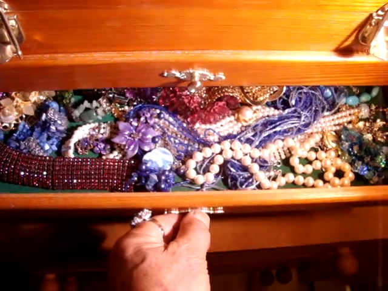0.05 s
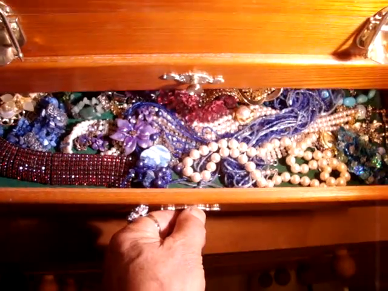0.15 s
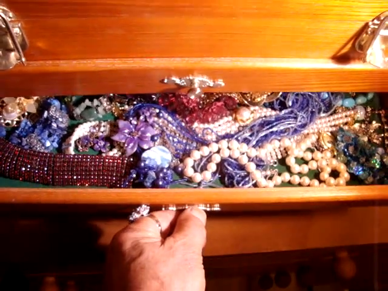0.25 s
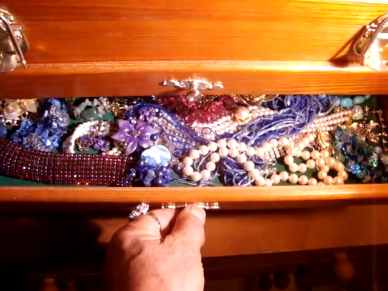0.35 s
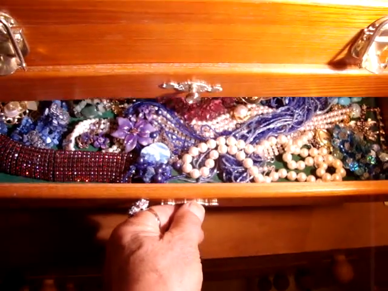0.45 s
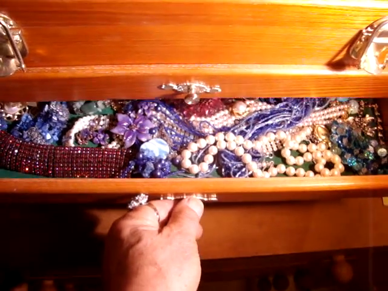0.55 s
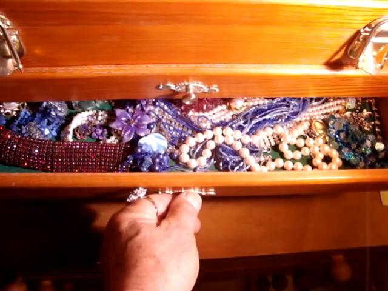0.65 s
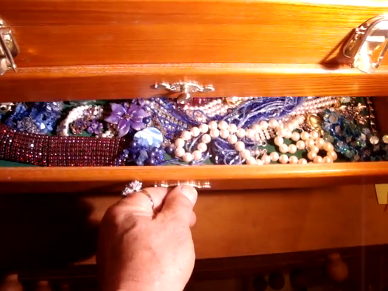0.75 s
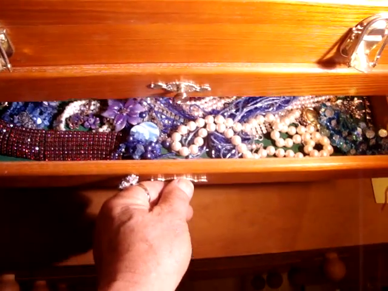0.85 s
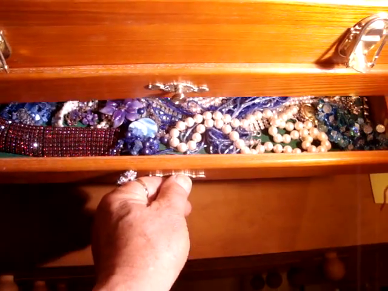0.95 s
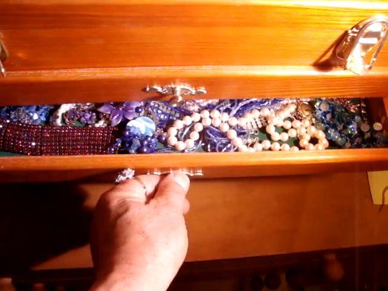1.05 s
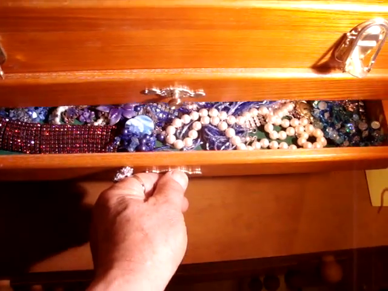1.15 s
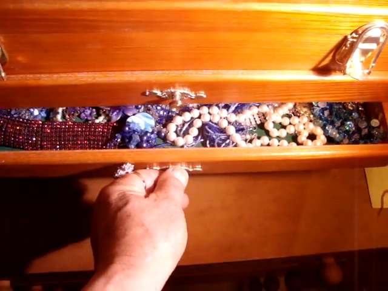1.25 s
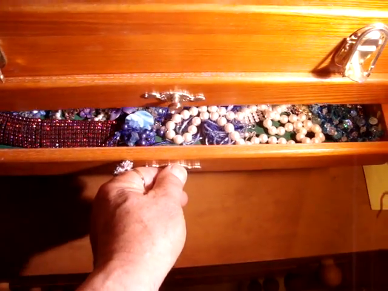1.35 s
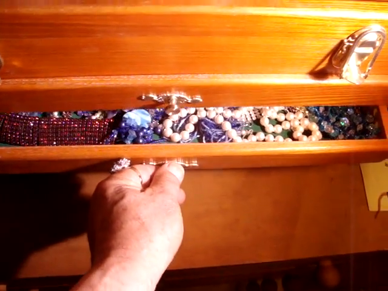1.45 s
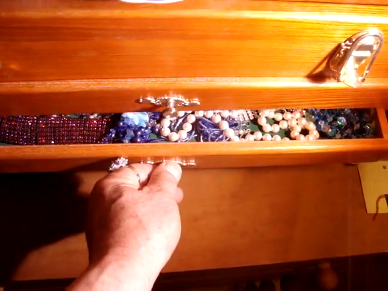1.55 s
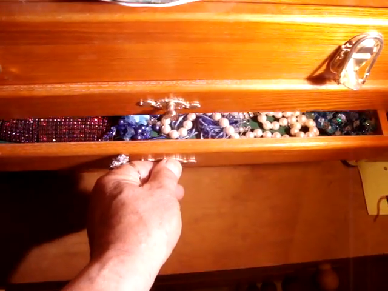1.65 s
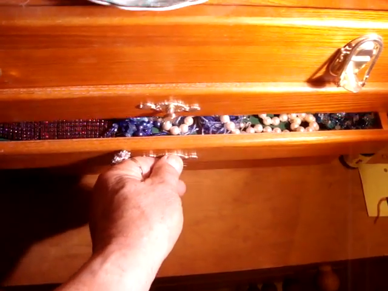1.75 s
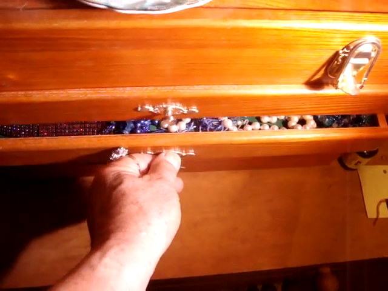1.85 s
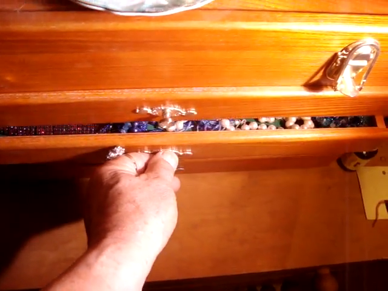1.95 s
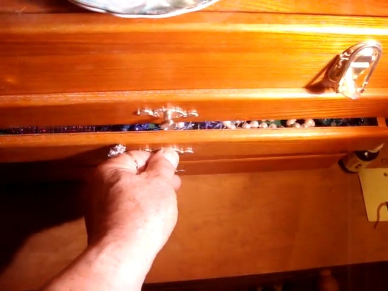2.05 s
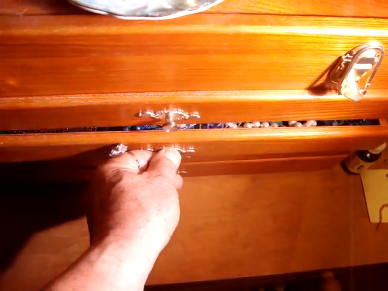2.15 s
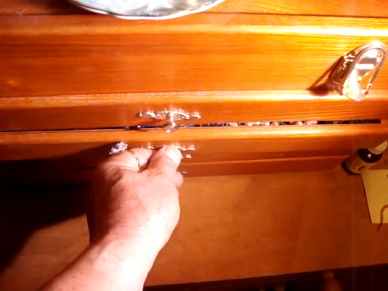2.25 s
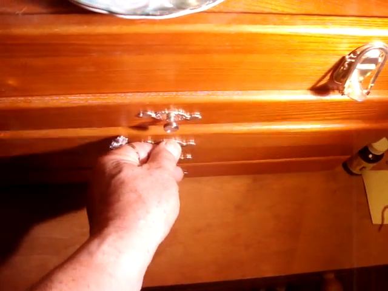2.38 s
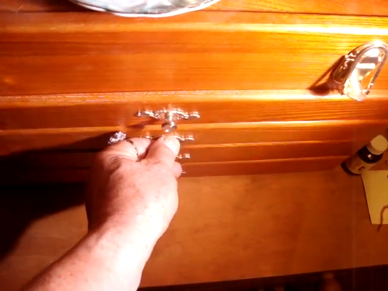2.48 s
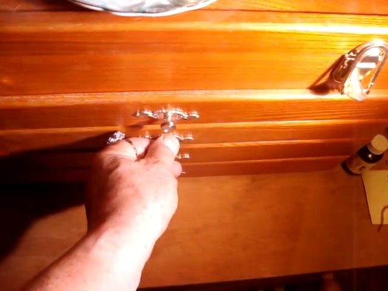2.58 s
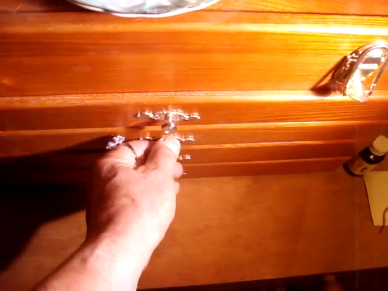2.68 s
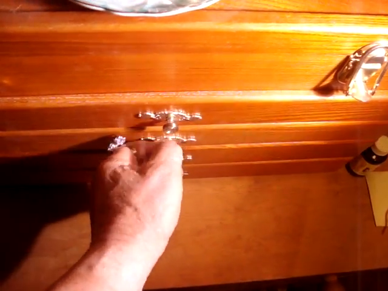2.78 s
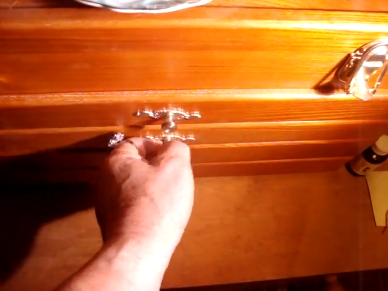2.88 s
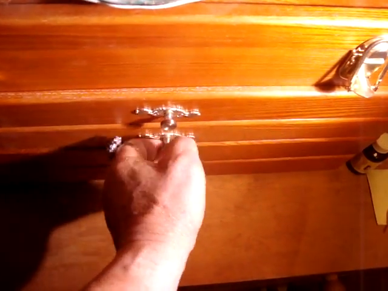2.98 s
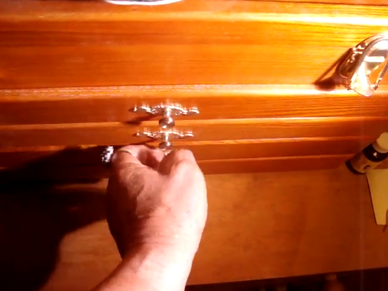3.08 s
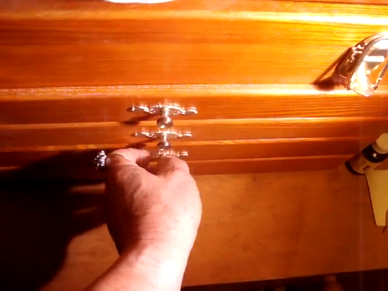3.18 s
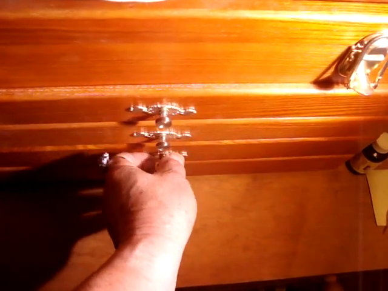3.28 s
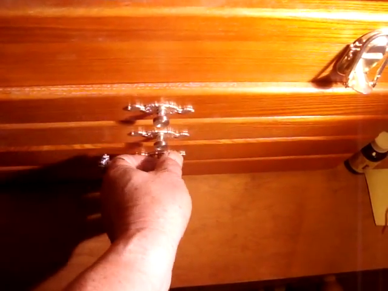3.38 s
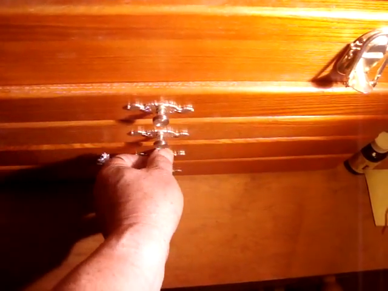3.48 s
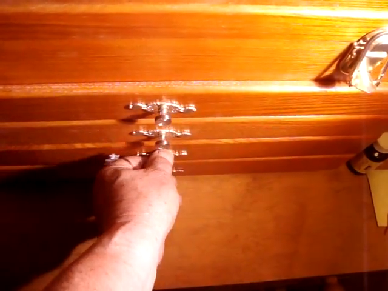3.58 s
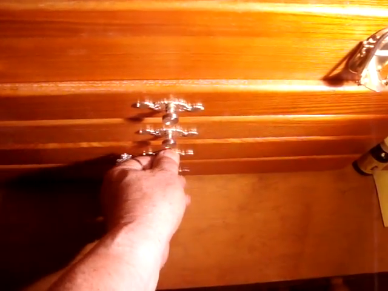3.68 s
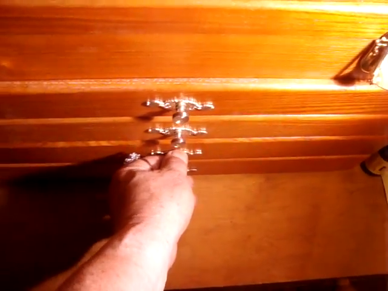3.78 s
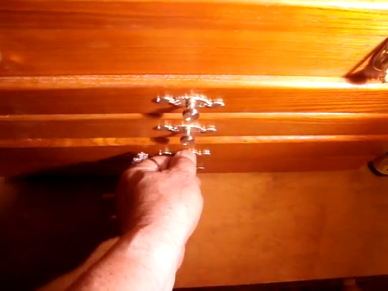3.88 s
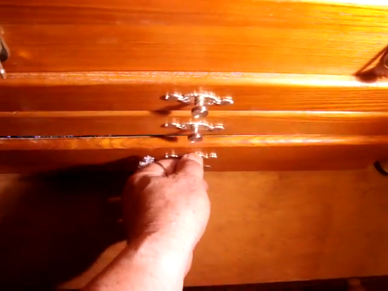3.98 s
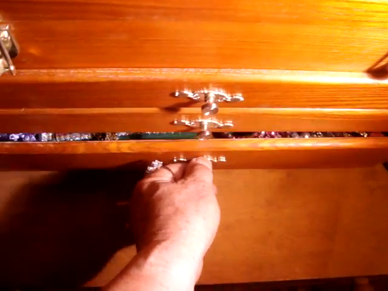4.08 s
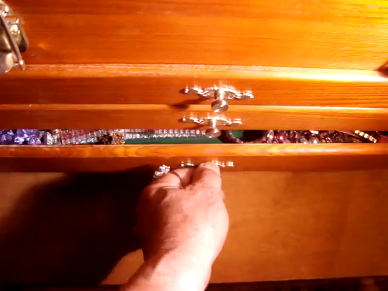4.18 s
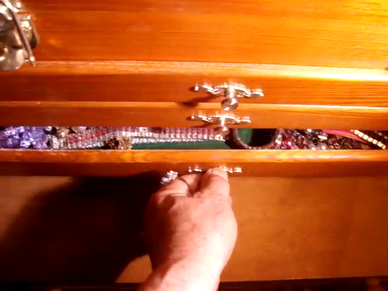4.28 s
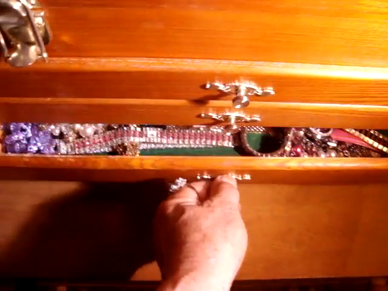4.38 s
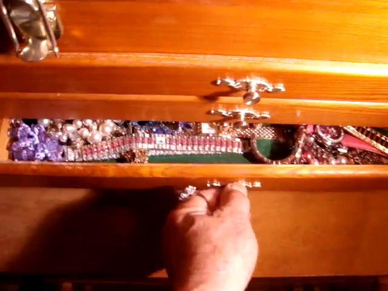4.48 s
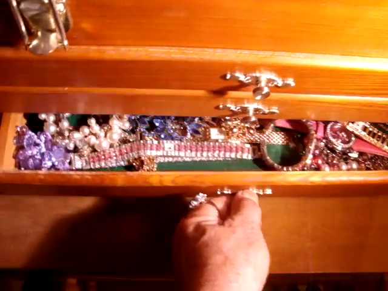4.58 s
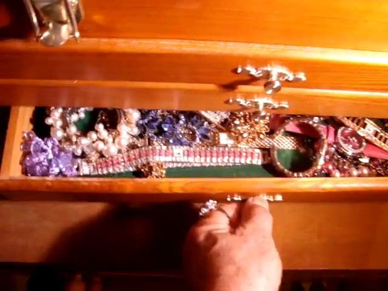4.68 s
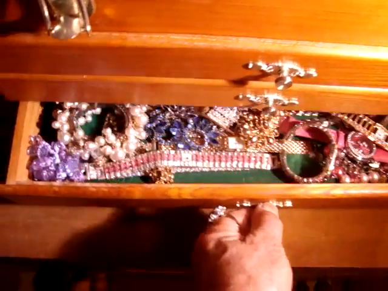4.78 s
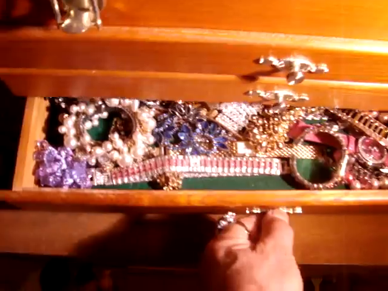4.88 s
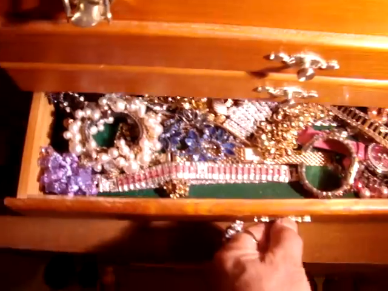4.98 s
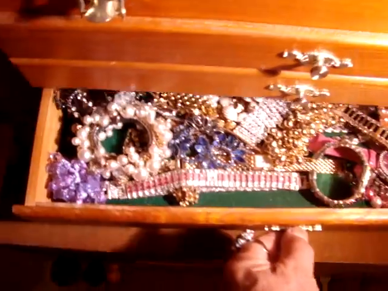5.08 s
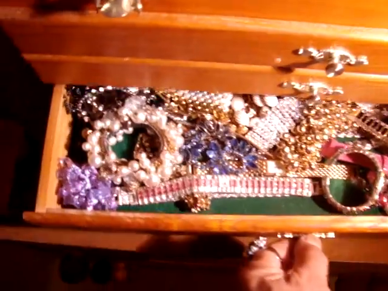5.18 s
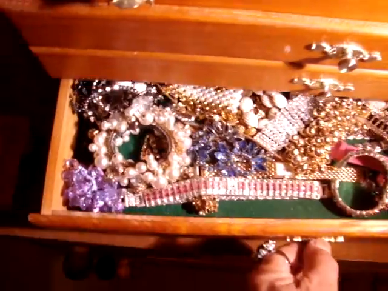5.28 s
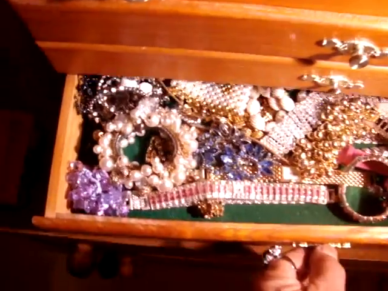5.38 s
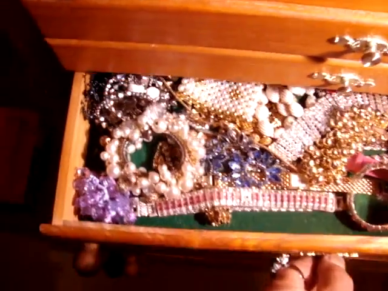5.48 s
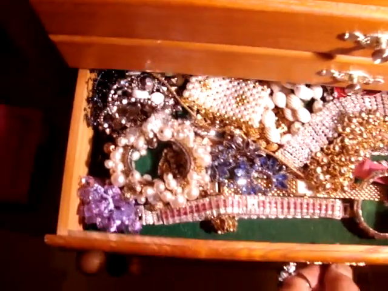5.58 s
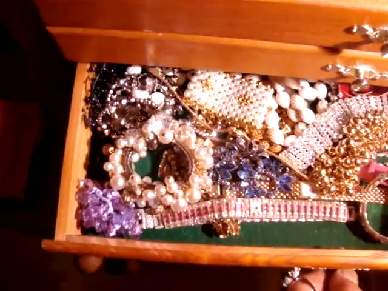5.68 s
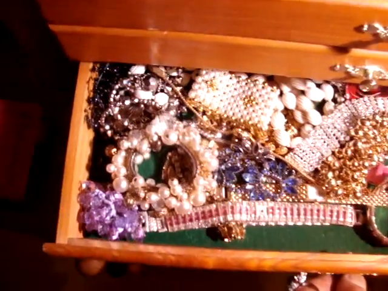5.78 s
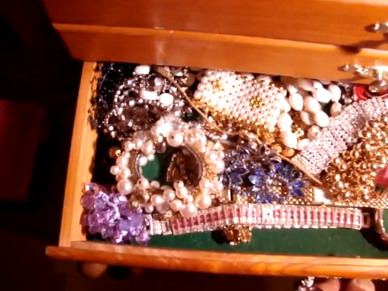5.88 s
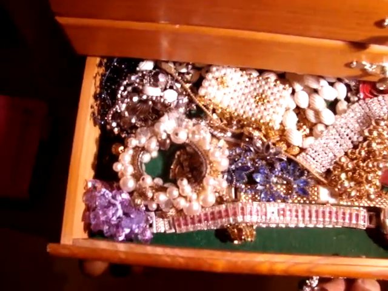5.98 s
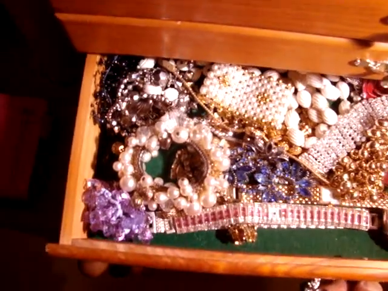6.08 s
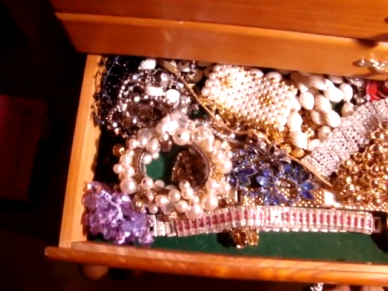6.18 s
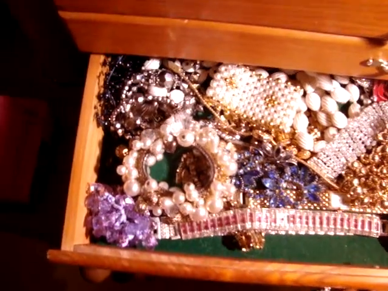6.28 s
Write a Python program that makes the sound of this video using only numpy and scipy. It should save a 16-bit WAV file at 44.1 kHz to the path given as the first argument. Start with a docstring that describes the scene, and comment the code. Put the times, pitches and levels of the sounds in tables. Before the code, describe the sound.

Close, dry rubbing and knocks of one wooden jewellery drawer closing and a second opening, over a quiet room's hiss.

```python
"""Jewellery chest drawers, close by.

One drawer slides in on dry wooden runners, beads ticking, touches and knocks shut. The fingers move to
the next metal pull; that drawer comes unstuck, slides out and drags to a halt. Slips of wood grain drive
the panels, knocks ring the chest, the pulls bounce in their mounts. Quiet room with steady hiss."""
import sys
import numpy as np
from scipy import signal
from scipy.fft import rfft, irfft
from scipy.io import wavfile

SR = 44100
rng = np.random.default_rng(int(sys.argv[2]) if len(sys.argv) > 2 else 0)


def inscribe(sig):
    """Save sig as 16-bit PCM at rate SR to the path in sys.argv[1].

    A 1-D sig is mono; a 2-D sig holds one channel per row.
    Samples are clipped to [-1, 1] before scaling.
    """
    pcm = np.round(np.clip(np.atleast_2d(sig).T, -1, 1) * 32767)
    wavfile.write(sys.argv[1], SR, pcm.astype(np.int16))


N = 279622

# Runner friction; push = upper drawer in, pull = lower drawer out: time_s, level_db
PUSH_FRICTION = [(0.44, -53), (0.506, -55), (0.516, -45), (0.7, -45.9), (0.84, -44.6), (0.92, -48),
                 (1.03, -49.5), (1.15, -56), (1.25, -52), (1.48, -57), (1.79, -51), (1.87, -59),
                 (1.97, -65), (2.02, -57), (2.18, -63), (2.48, -55)]
PULL_FRICTION = [(3.88, -58), (4.068, -56), (4.1, -52), (4.35, -55), (4.6, -48), (4.664, -40.5),
                 (4.684, -48), (4.735, -44.5), (4.844, -48), (4.95, -46), (5.02, -45.7), (5.12, -52),
                 (5.354, -58), (5.53, -55)]
# Broad rubbing spectra: freq_hz, gain_db
PUSH_SPECTRUM = [(60, -43), (200, -28), (600, -1), (1170, -2.3), (1800, -0.5), (2200, -1.8), (3000, -1.5),
                 (3700, -8.5), (4900, -3.8), (5800, -5.8), (6600, -11.5), (10000, -14.8)]
PULL_SPECTRUM = [(60, -28), (200, -10.5), (500, -5.0), (1200, 0.0), (2100, -1.6), (3000, -1.9),
                 (4300, -9.3), (5600, -13.7), (10000, -17.4)]
DRAG_SPECTRUM = [(60, -32), (200, -5), (550, -2.5), (950, 3), (1450, -6.5), (2800, -2.7), (4500, -9.5),
                 (10000, -16.5)]
# Drawer panel resonances: centre_hz, width_hz, lift_db
PUSH_RESONANCES = [(605, 150, 8.7), (985, 110, 7), (1350, 130, 14.8), (1590, 180, 9.5), (2510, 140, 9),
                   (3315, 180, 13.6), (4026, 160, 8), (4274, 160, 5.5)]
PULL_RESONANCES = [(595, 75, 8), (743, 100, 9.5), (1093, 120, 8), (1391, 85, 8.5), (1826, 240, 6.8),
                   (2972, 120, 5.5), (3458, 120, 4), (4203, 128, 5.1)]
# Band favoured by the travelling rubbing point: time_s, centre_hz
PUSH_BAND = [(.45, 1520), (.52, 2500), (.72, 3300), (.79, 4170), (1.03, 4200), (1.25, 2880), (1.9, 2880),
             (2.2, 1000)]
PULL_BAND = [(4.38, 1300), (4.5, 2860), (4.98, 700)]
# Dry patches on the runners: start_s, length_s, level_db, centre_hz, width_hz
DRY_PATCHES = [(.76, .14, -53, 4150, 800), (1.2, .13, -60, 4200, 1600), (1.56, .2, -56.5, 2950, 600),
               (1.74, .1, -53.5, 2950, 900), (4.07, .06, -58, 2600, 2200), (4.46, .13, -58, 3650, 1500),
               (4.99, .1, -56.5, 3850, 1000), (5.25, .045, -56, 2800, 900), (5.568, .04, -49, 900, 450)]

# Wood on wood; ring_db is lower where the hand damps it:
# start_s, level_db, low_hz, soft_hz, settle_s, spot_hz, width_hz, lift_db, ring_db
WOOD_KNOCKS = [(.1623, -19.5, 450, 1200, .0029, 1000, 450, 8, -5),
               (1.793, -20, 200, 220, .0063, 280, 140, 6, -2),
               (2.4938, -11.8, 150, 650, .004, 520, 130, 4, -1),
               (2.547, -4.4, 110, 4800, .00417, 1300, 420, 8, -.2),
               (3.282, -29.5, 150, 750, .008, 1000, 500, 6, 0),
               (3.736, -25, 130, 200, .005, 185, 70, 13, -2),
               (4.075, -9.5, 150, 190, .0065, 305, 70, 13, -7),
               (4.661, -32, 700, 3000, .004, 2050, 900, 7, 0),
               (5.563, -10.5, 115, 125, .006, 172, 55, 20.5, -7),
               (5.632, -21, 170, 220, .0089, 195, 45, 16, -3)]
# Further touches of a drawer landing askew: settle_share, gain_db, hardness_ratio
KNOCK_REBOUNDS = [(.46, -5, 1.15), (1, 2.4, .39)]
# Spectra of a knock's first crack and of the dense case ringing: freq_hz, gain_db
CRACK_SPECTRUM = [(60, -31), (200, -8.5), (520, 0), (780, -8), (1000, -1.5), (1600, 1.5), (2300, -2.5),
                  (2800, -15), (3200, -10), (4200, -26), (6500, -25.5), (10000, -29)]
CASE_SPECTRUM = [(60, -18), (150, -4), (450, -10), (800, 3.5), (1300, 3), (2000, 5.5), (2700, -12),
                 (4500, -25), (10000, -31)]
# Decay of the case ringing: freq_hz, t60_s
CASE_DECAY = [(100, 0.44), (400, 0.27), (1200, 0.098), (2500, 0.021), (9000, 0.013)]
# Modes of the chest and of the metal pull: pitch_hz, level_db, t60_s
CHEST_MODES = [(106, -35, .18), (164, -30, .16), (242, -30, .12), (290, -31, .12), (415, -20.5, .11),
               (474, -21.5, .08), (623, -25.5, .08), (806, -25.5, .095), (955, -24, .08), (1083, -20, .075),
               (1232, -21, .06), (1390, -18.5, .08), (1630, -22.5, .07), (1950, -21.5, .065),
               (2047, -23, .06), (2280, -20, .034), (2700, -31, .028), (3100, -27, .033), (4480, -46, .025)]
METAL_MODES = [(1560, -6, .03), (1920, -1.5, .065), (2440, 1.5, .023), (2930, 3, .018), (3400, 3, .016),
               (3880, -1, .012), (4258, -2, .02), (5300, -7, .01), (7260, -6, .012), (8650, -1, .013)]
# Pull tapping in its mount: start_s, level_db, low_hz, soft_hz, first_gap_s
METAL_TAPS = [(.1628, -33.5, 2780, 5500, .0015), (.4205, -36.5, 2700, 4200, .0012),
              (2.496, -38, 2000, 2300, .003), (3.072, -47, 900, 2500, .004),
              (3.281, -33, 1650, 1600, .0104), (3.799, -43, 1500, 3500, .004),
              (4.661, -44, 1500, 8000, .003)]
# Bead on bead: start_s, level_db, pitch_hz, t60_s, other_pitch_hz, other_gain_db
BEAD_TICKS = [(.4193, -34, 8150, .008, 9650, -3), (2.288, -41, 6900, .01, 6000, -6)]

# Background hiss: freq_hz, gain_db
HISS_SPECTRUM = [(15, -42), (25, -17), (42, -13.5), (96, -12.5), (204, -5.5), (320, -2.7), (410, -2),
                 (568, -1.5), (1430, -6.6), (2300, -8.4), (4500, -13.3), (9800, -19.3), (12700, -63),
                 (21600, -120)]
# Low room rumble: time_s, level_db
RUMBLE_LEVELS = [(0, -70), (4.2, -71), (4.6, -86), (6.3, -91)]


def drawer_in(gain_db=1.2):
    """Upper drawer pushed in: firmly, then in weaker nudges."""
    friction = stroke(PUSH_FRICTION, rise_s=.55, release_s=.04)
    return amp(gain_db) * slide(friction, PUSH_SPECTRUM, PUSH_RESONANCES, PUSH_BAND,
                                band_db=3.3, band_oct=.15, light_db_per_oct=-.6, hard_db_per_oct=-.5)


def drawer_out(gain_db=1.2):
    """Lower drawer pulled out: it catches once and its rubbing sinks."""
    friction = stroke(PULL_FRICTION, rise_s=.1, release_s=.04)
    return amp(gain_db) * slide(friction, PULL_SPECTRUM, PULL_RESONANCES, PULL_BAND,
                                band_db=4.2, band_oct=.34, light_db_per_oct=2.3, hard_db_per_oct=-1.7)


def drawer_drag(start_s=5.575, hold_s=.06, level_db=-45.2, band_hz=490):
    """Almost out, the lower drawer sags and drags to a halt with a duller rub."""
    friction = stroke([(start_s, level_db), (start_s + hold_s, level_db)], rise_s=.028, release_s=.11)
    return slide(friction, DRAG_SPECTRUM, PULL_RESONANCES, [(start_s, band_hz)],
                 band_db=2, band_oct=.8, light_db_per_oct=-.3, hard_db_per_oct=0)


def stroke(levels, rise_s, release_s):
    """Friction amplitude: builds as the drawer creeps, follows the levels, dies away."""
    t = np.arange(N) / SR
    time_s, level_db = np.transpose(levels)
    power = np.interp(t, [time_s[0] - rise_s, time_s[0], time_s[-1], time_s[-1] + release_s],
                      [0, 1, 1, 0])
    return amp(np.interp(t, time_s, level_db)) * np.sqrt(power)


def slide(friction, spectrum, resonances, band, band_db, band_oct, light_db_per_oct, hard_db_per_oct,
          slips_per_s=14000, spread_db=1.5, chatter_db=.5, light_ring_share=.5):
    """Tiny slips of wood grain on the runners drive the drawer panels."""
    sizes = rng.standard_normal(N) * amp(spread_db * np.minimum(rng.exponential(1, N), 4))
    slips = sizes * (rng.random(N) < slips_per_s / SR)
    hz, t, slip_stft = signal.stft(unit(slips), SR, nperseg=1024)
    # Panel ringing and brightness follow the effort.
    effort = np.interp(t, np.arange(N) / SR, friction) / friction.max()
    panel_db = sum(lift_db / (1 + (2 * (hz - centre_hz) / width_hz) ** 2)
                   for centre_hz, width_hz, lift_db in resonances)
    ring_share = light_ring_share + (1 - light_ring_share) * effort
    wood_db = lookup(spectrum, hz)[:, None] + panel_db[:, None] * ring_share
    tilt_db_per_oct = light_db_per_oct + (hard_db_per_oct - light_db_per_oct) * effort
    band_hz = np.interp(t, *np.transpose(band))
    offset_oct = np.log2(np.maximum(hz, 100)[:, None] / band_hz)
    gain = amp(wood_db + offset_oct * tilt_db_per_oct + band_db * np.exp(-(offset_oct / band_oct) ** 2))
    gain /= np.sqrt(np.mean(gain ** 2, axis=0))
    rub = signal.istft(slip_stft * gain, SR, nperseg=1024)[1][:N]
    uneven_pressure = unit(butterworth(rng.standard_normal(N), "lowpass", cutoff_hz=45))
    return rub * friction * amp(chatter_db * uneven_pressure)


def rasps(slips_per_s=3000):
    """A dry patch passes: coarser slips swell and fade in one band."""
    out = np.zeros(N)
    for start_s, length_s, level_db, centre_hz, width_hz in DRY_PATCHES:
        slips = rng.standard_normal(N) * (rng.random(N) < slips_per_s / SR)
        scratch = resonance(slips[:round(length_s * SR)], centre_hz, width_hz)
        scratch = resonance(scratch, centre_hz, width_hz)
        swell = np.sin(np.linspace(0, np.pi, len(scratch)))
        add(out, start_s, amp(level_db) * unit(scratch) * swell)
    return out


def knocks(crack_db=-5, modes_db=-3.5, case_db=3.6, crunch_db=-20, rebound_low_hz=480):
    """Each blow cracks, sounds the struck spot and rebounds twice; the chest rings on."""
    out = np.zeros(N)
    crack = disperse(amp(crack_db) * click(CRACK_SPECTRUM))
    modes = disperse(amp(modes_db) * ring(CHEST_MODES))
    for start_s, level_db, low_hz, soft_hz, settle_s, spot_hz, width_hz, lift_db, ring_db in WOOD_KNOCKS:
        spot = crack + (amp(lift_db) - 1) * resonance(crack, spot_hz, width_hz)
        for settle_share, gain_db, hardness in [(0, 0, 1), *KNOCK_REBOUNDS]:
            chest = modes + amp(case_db) * case_ring()
            blow = spot + amp(ring_db) * chest + amp(crunch_db) * crunch()
            # Rebounds are too light to drive the bass.
            lowest_hz = max(low_hz, rebound_low_hz) if settle_share else low_hz
            touch = contact(blow, lowest_hz, hardness * soft_hz)
            add(out, start_s + settle_share * settle_s, amp(level_db + gain_db) * touch)
    return out


def disperse(x, lag_at_1khz_s=.000589):
    """Bending waves in a panel: treble arrives first, bass last."""
    hz = np.fft.rfftfreq(len(x), 1 / SR)
    phase_rad = -4 * np.pi * lag_at_1khz_s * np.sqrt(hz * 1000)
    return irfft(rfft(x) * np.exp(1j * phase_rad), len(x))


def case_ring(build_s=.001, size=8192):
    """Countless weak modes and echoes in the chest; treble dies first."""
    hz, t, noise_stft = signal.stft(rng.choice([-1., 1.], size), SR, nperseg=256)
    gain_db = lookup(CASE_SPECTRUM, hz)[:, None] - 60 * t / lookup(CASE_DECAY, hz)[:, None]
    tail = signal.istft(noise_stft * amp(gain_db), SR, nperseg=256)[1][:size]
    onset = 1 - np.exp(-np.arange(size) / SR / build_s)
    return onset * tail / np.linalg.norm(tail)


def crunch(t60_s=.046, size=8192):
    """Rough faces bed in with a brief rattle of tiny contacts."""
    grit = rng.standard_normal(size) * amp(-60 * np.arange(size) / SR / t60_s)
    return contact(grit, low_hz=1500, soft_hz=5500)


def metal_pulls(gain_db=-5, bounces=3, bounce_db=-4, gap_ratio=.7):
    """A small pull bounces ever faster in its mount, damped by the fingers."""
    out = np.zeros(N)
    for start_s, level_db, low_hz, soft_hz, first_gap_s in METAL_TAPS:
        tap = contact(ring(METAL_MODES), low_hz, soft_hz)
        for bounce in range(bounces):
            add(out, start_s, amp(level_db + gain_db + bounce * bounce_db) * tap)
            start_s += first_gap_s * gap_ratio ** bounce
    return out


def beads(attack_s=.0003):
    """Two beads in the moving drawer touch; each rings at its own pitch."""
    out = np.zeros(N)
    for start_s, level_db, pitch_hz, t60_s, other_pitch_hz, other_gain_db in BEAD_TICKS:
        tick = ring([(pitch_hz, level_db, t60_s), (other_pitch_hz, level_db + other_gain_db, t60_s)])
        onset = 1 - np.exp(-np.arange(len(tick)) / SR / attack_s)
        add(out, start_s, onset * tick)
    return out


def room(hiss_db=-51.5):
    """Steady hiss; a faint low rumble that drops away late on."""
    rumble = noise([(25, -29), (54, 2), (75, -3), (120, 5.5), (220, -23), (1000, -68)])
    rumble_db = np.interp(np.arange(N) / SR, *np.transpose(RUMBLE_LEVELS))
    return amp(hiss_db) * noise(HISS_SPECTRUM) + amp(rumble_db) * rumble


def contact(x, low_hz, soft_hz):
    """A light touch drives little below low_hz, a soft one little above soft_hz."""
    return butterworth(butterworth(x, "highpass", low_hz, order=3), "lowpass", soft_hz)


def ring(modes, size=8192):
    """Sum of decaying modes."""
    t = np.arange(size) / SR
    return sum(amp(level_db - 60 * t / t60_s) * np.cos(2 * np.pi * pitch_hz * t)
               for pitch_hz, level_db, t60_s in modes)


def click(spectrum, size=8192):
    """Minimum-phase pulse of a given spectrum, peak 1."""
    log_gain = np.log(amp(lookup(spectrum, abs(np.fft.fftfreq(size, 1 / SR)))))
    pulse = np.fft.ifft(np.exp(np.conj(signal.hilbert(log_gain)))).real
    return pulse / abs(pulse).max()


def noise(spectrum):
    """Steady noise, rms 1, shaped by rows of freq_hz, gain_db."""
    gain = amp(lookup(spectrum, np.fft.rfftfreq(N, 1 / SR)))
    return unit(irfft(rfft(rng.standard_normal(N)) * gain, N))


def resonance(x, centre_hz, width_hz):
    """Band-pass, gain 1 at centre."""
    return signal.lfilter(*signal.iirpeak(centre_hz, centre_hz / width_hz, fs=SR), x)


def butterworth(x, kind, cutoff_hz, order=2):
    """Causal low-pass or high-pass."""
    return signal.sosfilt(signal.butter(order, cutoff_hz, kind, fs=SR, output="sos"), x)


def lookup(table, hz):
    """Interpolate on a log-frequency axis."""
    freq_hz, value = np.transpose(table)
    return np.interp(np.log(hz + 1), np.log(freq_hz + 1), value)


def amp(db):
    """Decibels to gain."""
    return 10 ** (np.asarray(db) / 20)


def unit(x):
    """Scale to rms 1."""
    return x / np.sqrt(np.mean(x ** 2) + 1e-20)


def add(mix, start_s, sound):
    """Mix in at start_s."""
    part = mix[round(start_s * SR):][:len(sound)]
    part += sound[:len(part)]


def scene():
    """One drawer shuts, the next opens; mono."""
    rubbing = drawer_in() + drawer_out() + drawer_drag() + rasps()
    return (rubbing + knocks() + metal_pulls() + beads() + room())[None]


def record(dry):
    """Small microphone: soft overload on the loudest knock, narrow band."""
    saturation, low_cut_hz, high_cut_hz = .62, 48, 10080
    squashed = saturation * np.tanh(dry / saturation)
    thinned = butterworth(squashed, "highpass", low_cut_hz)
    steep_lowpass = signal.firwin(801, high_cut_hz, window=("kaiser", 9), fs=SR)
    return signal.oaconvolve(thinned, steep_lowpass[None], "same")


dry = scene()
out = record(dry)
inscribe(out)
```